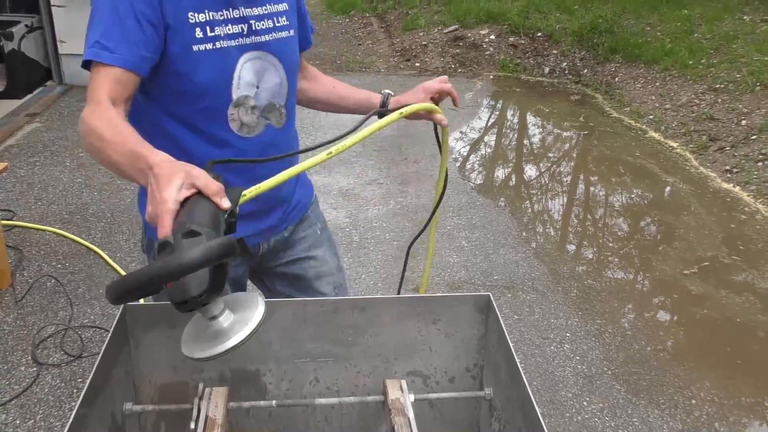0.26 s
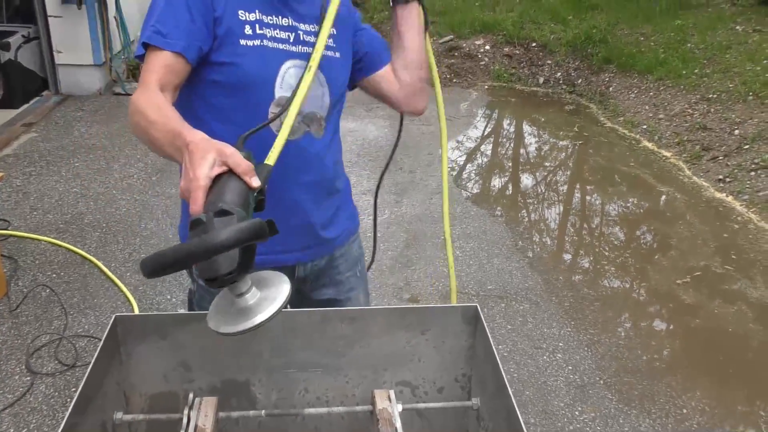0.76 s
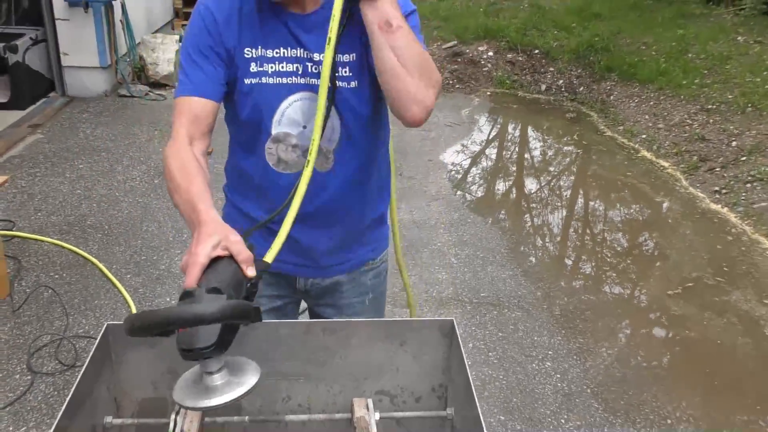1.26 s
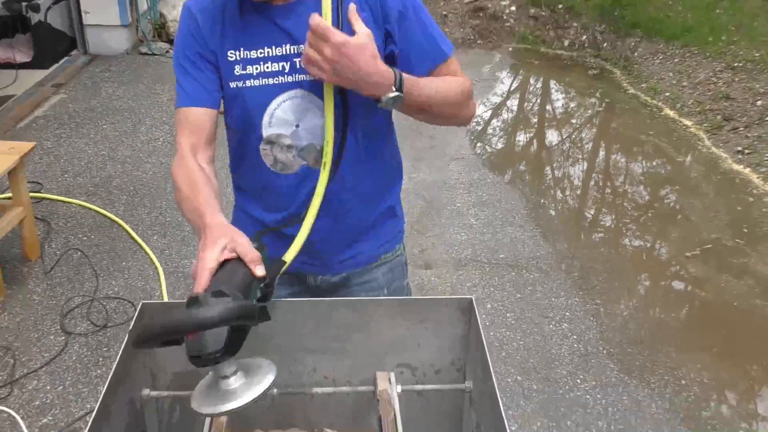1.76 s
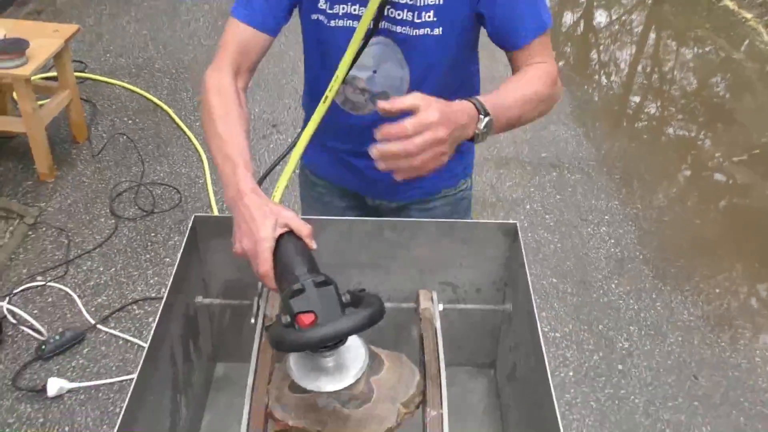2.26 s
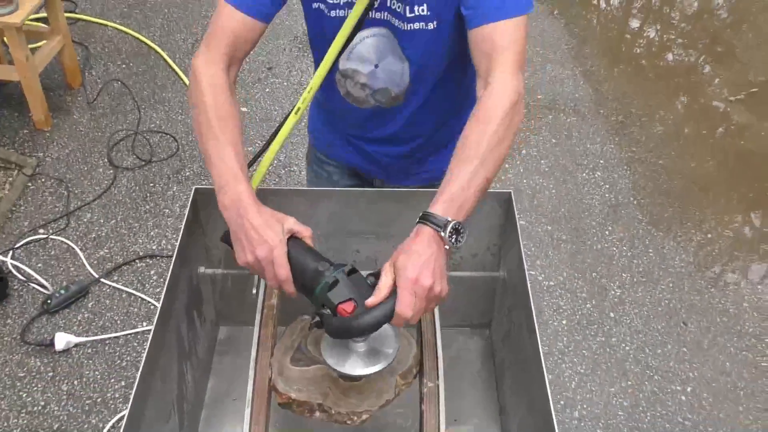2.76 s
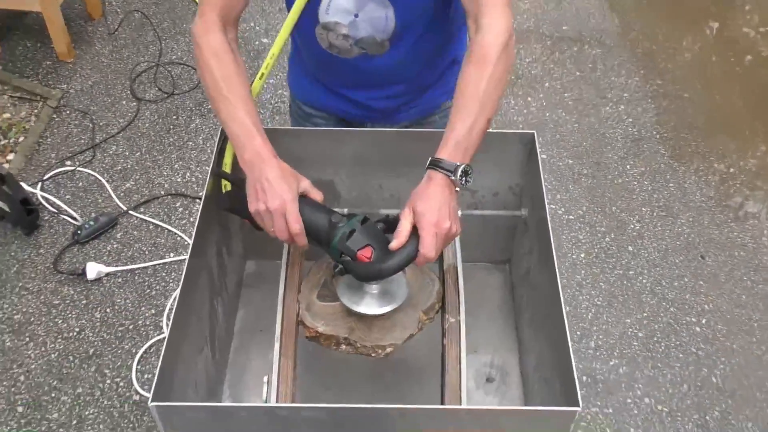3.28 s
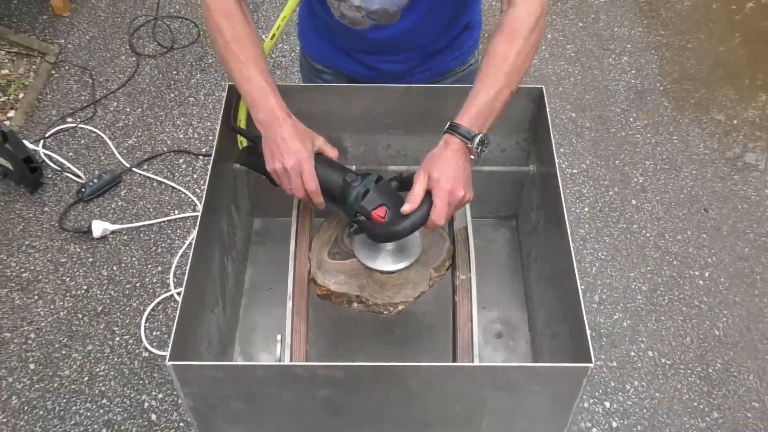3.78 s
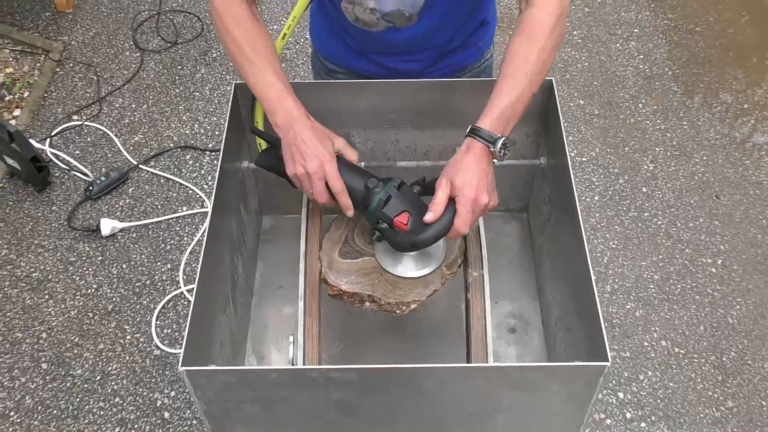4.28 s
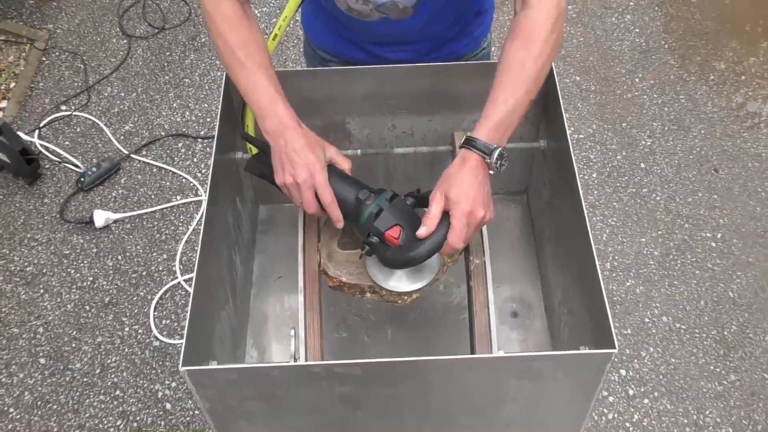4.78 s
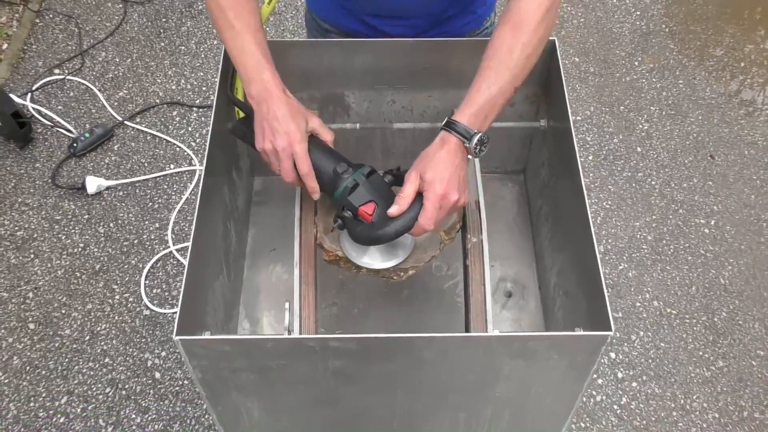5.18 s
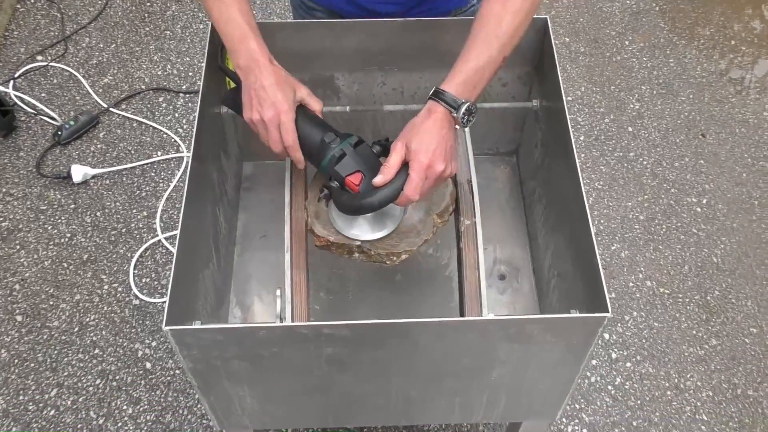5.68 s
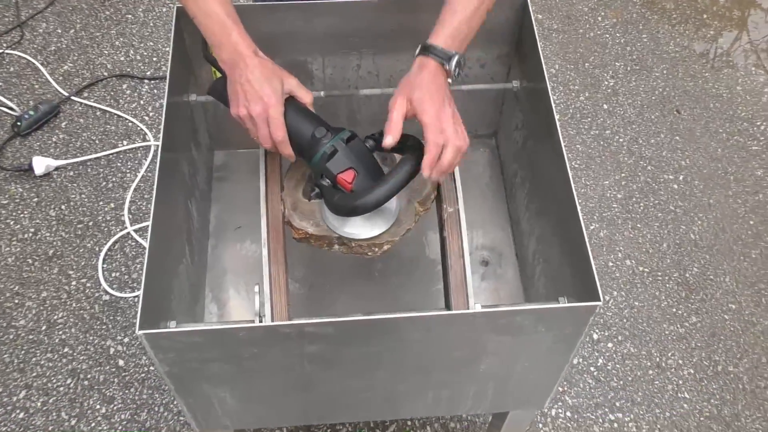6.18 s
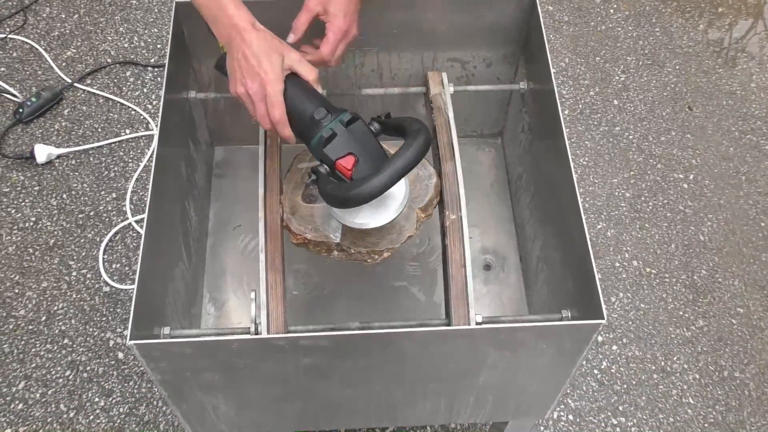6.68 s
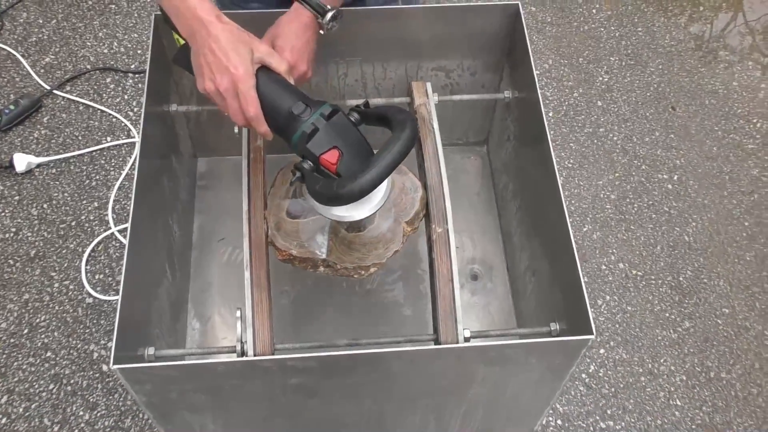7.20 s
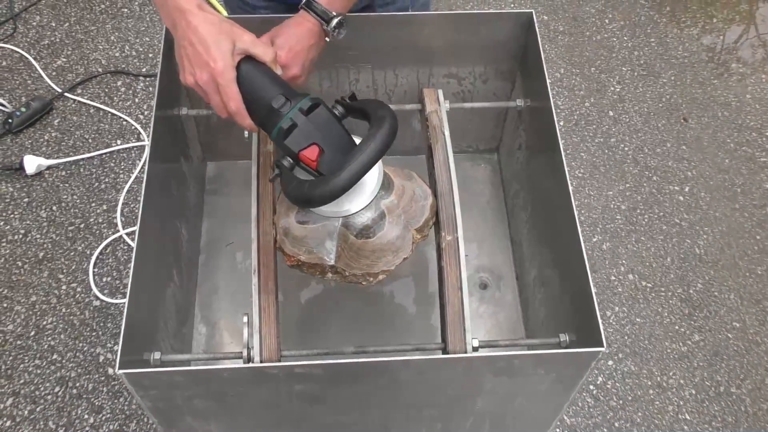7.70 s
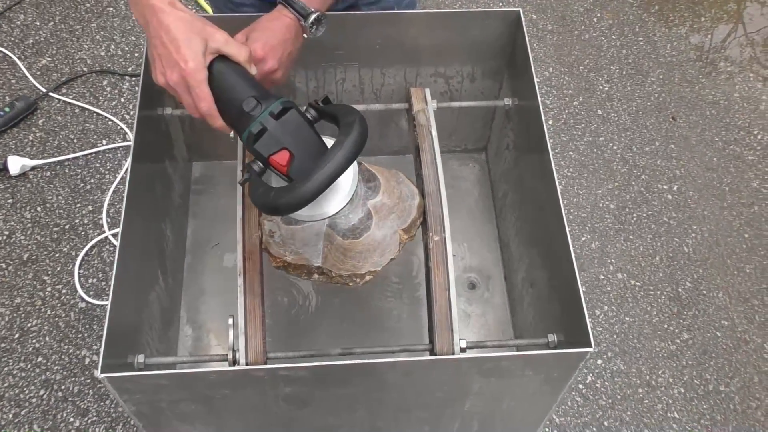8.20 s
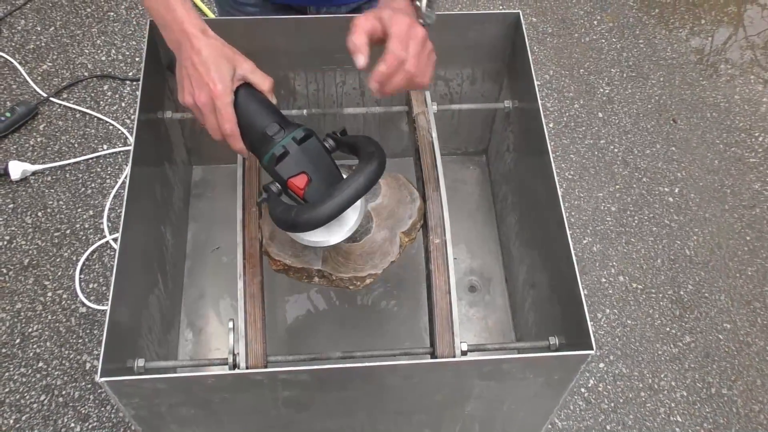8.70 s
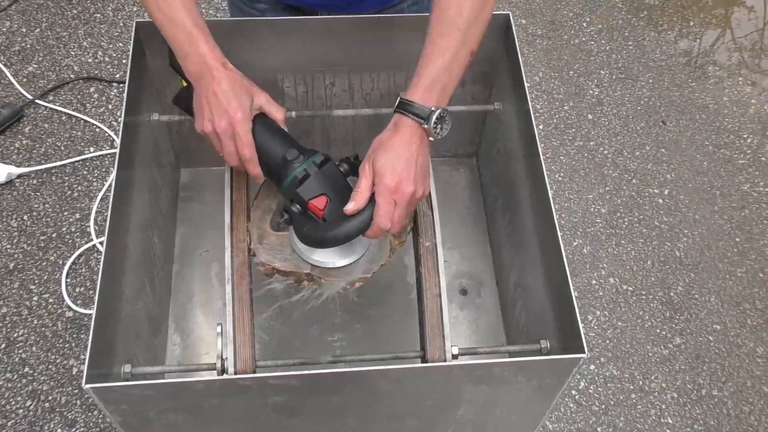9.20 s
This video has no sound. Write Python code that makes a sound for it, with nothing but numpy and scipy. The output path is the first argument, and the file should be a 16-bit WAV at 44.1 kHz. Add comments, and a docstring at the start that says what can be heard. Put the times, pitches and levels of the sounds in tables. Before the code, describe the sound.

Outdoors, about a metre away, an electric wet grinder runs without pause: singing gear, buzzing rattle, thin whistle and rushing fan air. After nearly three seconds the pad meets wet stone with a scrape, adding gritty hiss, water spray and a low steel tub drone. The hiss eases around six and a half seconds, then the pad judders and bites again at the end.

```python
"""Wet grinder on stone in a tub

Outdoors, microphone about a metre from a water-fed angle grinder polishing a stone slab in a steel tub.
The motor hums, buzzes and whistles at multiples of its speed, and the fan blows as coloured, ringing noise.
The bevel gear sings and rattles under a tooth load that swings with the spindle and the mains.
When the pad is pressed on the wet stone, noise hisses as grit, the gear rattles less and the tub drones."""
import sys
import numpy as np
from scipy import signal
from scipy.fft import rfft, irfft, next_fast_len
from scipy.io import wavfile

SR = 44100
rng = np.random.default_rng(int(sys.argv[2]) if len(sys.argv) > 2 else 0)


def transcribe(signal):
    """Save signal, clipped to [-1, 1], as a 16-bit WAV file at the path in sys.argv[1]."""
    frames = np.atleast_2d(signal).T
    limited = np.clip(frames, -1, 1)
    pcm = np.round(limited * 32767).astype(np.int16)
    wavfile.write(sys.argv[1], SR, pcm)


N = 416744
TIME = np.arange(N) / SR  # s
FREQ = np.maximum(np.fft.rfftfreq(N, 1 / SR), 1)  # Hz, kept above zero for the logarithms

# Levels in the tables stand before the trims in the functions.
# Event lengths run from the peak to a fall to 1/e; resonance widths are those of one of two equal stages.

# Armature speed, sagging as the tool is loaded. Each row: time in seconds, speed in turns per second.
ARMATURE_SPEED = [(0.0, 311.4), (0.76, 310.6), (1.34, 307.9), (1.44, 311.5), (1.74, 309.4), (2.28, 310.7),
                  (3.12, 306.7), (3.28, 309.5), (3.76, 306.9), (3.88, 310.5), (4.14, 304.0), (4.52, 308.8),
                  (5.02, 304.4), (5.34, 310.2), (6.06, 309.4), (6.58, 314.3), (6.78, 311.9), (7.18, 313.1),
                  (7.44, 309.1), (8.26, 310.2), (8.52, 306.8), (8.62, 309.4), (9.26, 306.9), (9.45, 301.8)]
# How strongly the gear sings; its rattle follows in part. Each row: time in seconds, level in dB.
GEAR_SINGING = [(0, -32), (.45, -32), (.9, -30), (1.3, -32.5), (1.53, -34), (1.7, -30.5), (2.5, -28.5),
                (2.75, -29.5), (2.9, -37), (3.12, -34.5), (3.3, -28.5), (3.8, -31.5), (4.4, -30),
                (5.5, -35.5), (6, -31.5), (7.08, -27.5), (7.5, -30), (8.5, -30.5), (8.75, -27.5),
                (8.95, -32), (9.45, -30.5)]
# Commutator whistle. Each row: time in seconds, level in dB.
BRUSH_WHISTLE = [(0, -40.5), (.5, -41.5), (.75, -34), (1.0, -44), (2.9, -40), (3.25, -36), (3.8, -41.5),
                 (5.1, -36.5), (7.3, -36), (7.55, -33.5), (8.6, -34), (9.45, -45)]
# Armature hum, louder inside the tub. Each row: time in seconds, level in dB.
ARMATURE_HUM = [(0, -56), (.9, -55), (1.2, -47.5), (2.05, -51.5), (3.1, -43.5), (4.5, -45.5), (6.4, -42),
                (7.5, -46), (8.9, -44), (9.45, -55)]
# Pad on the wet stone. Each row: time in seconds, hiss level in dB.
PAD_CONTACT = [(0, -85), (2.7, -74), (2.92, -37.5), (3.1, -33.5), (3.45, -40.5), (3.72, -34.5), (3.85, -37),
               (3.91, -31.5), (4.4, -32.5), (4.75, -34), (5.15, -30), (5.6, -32), (6.43, -32), (6.47, -42),
               (7.3, -44.5), (8.25, -45.5), (8.7, -60), (9.28, -39), (9.45, -32.5)]
# Water flung off the pad. Each row: time in seconds, level in dB.
WATER_SPRAY = [(0, -54), (3.75, -79), (4.0, -42), (5.1, -38.5), (5.7, -36), (6.5, -41.5), (7.25, -51),
               (7.75, -42), (8.3, -42), (9.15, -48), (9.45, -34)]
# The pad judders on the stone. Each row: peak in seconds, level in dB, length in seconds.
PAD_JUDDERS = [(9.046, -38, 0.017), (9.12, -35, 0.0091), (9.2, -44, 0.013), (9.258, -33, 0.014),
               (9.355, -38, 0.03), (9.44, -38, 0.017)]
# Tub resonances. Each row: centre in Hz, width in Hz, relative level in dB.
TUB_MODES = [(66.6, 21, -19), (129, 7.5, -19), (144.2, 8.7, -5), (163, 5.1, -45), (185, 8.9, -4),
             (214, 17, -20)]
# Spectra of the fan air, the grit and the drops. Each row: frequency in Hz, relative density in dB per Hz.
AIR_SPECTRUM = [(25, -25), (90, -27), (170, -13), (250, -12), (380, -7), (520, -1.5), (680, -5),
                (900, -0.5), (1500, 1), (2000, 0.5), (3200, -2), (4500, -6), (5250, -7.5), (6300, -9),
                (10500, -7), (14500, -17.5)]
GRIT_SPECTRUM = [(25, -45), (100, -14), (650, -9), (1600, -8.5), (2800, 1.5), (3600, 1), (4200, -0.5),
                 (4700, -1), (5400, 0), (7000, -5.5), (10000, -4), (14500, -11)]
DROP_SPECTRUM = [(1000, -20), (4500, -21), (5700, -8), (7000, 3), (9000, 6), (11300, 10), (12500, 6),
                 (14500, -4)]
# Spread between the microphones. Each row: frequency in Hz, side against mid in dB.
STEREO_WIDTH = [(25, -5), (70, 0), (150, -7), (500, -14.5), (4000, -10), (9500, -24), (11500, -10),
                (14000, -6.5)]
# Place of the grinder. Each row: time in seconds, left minus right in dB.
GRINDER_PLACE = [(0, 3), (.8, 1.4), (1.7, 2.5), (2.7, 0), (4.2, -0.2), (5.3, 0), (6.8, -0.3), (8.3, 0.8),
                 (9.45, 0)]
# Magnetic buzz. Each row: multiple of the armature speed, level in dB.
MAGNETIC_BUZZ = [(6, -57), (9, -47.5), (10, -49), (12, -47), (13, -51), (17, -53)]
# Stone and pad resonances. Each row: centre in Hz, width in Hz, relative level in dB.
STONE_MODES = [(3460, 290, -4), (3600, 290, -0.5), (3940, 260, 2), (4196, 90, 3)]
# Air in the tub, rung by the grit. Each row: centre in Hz, width in Hz, relative level in dB.
CAVITY_MODES = [(537, 20, -3.5), (789, 52, 5.5), (872, 97, 6.5), (1263, 38, -30), (1529, 39, 10),
                (2040, 72, 12)]
# Lower and upper gear case resonances. Each row: centre in Hz, width in Hz, relative level in dB.
LOW_CASE_MODES = [(2249, 107, -2.5), (2361, 168, 2.5)]
HIGH_CASE_MODES = [(2574, 195, 2.5), (2768, 170, -13.5)]
# Left-right balance of the hiss, by frequency. Each row: frequency in Hz, left minus right in dB.
HISS_BALANCE = [(2500, -0.5), (4000, 2.7), (9000, -2), (12500, 1.5)]
# The rim of the pad catches the stone. Each row: peak in seconds, level in dB, length in seconds.
RIM_SCRAPES = [(3.685, -29.5, 0.014), (3.717, -42, 0.005), (3.92, -34.5, 0.02), (9.315, -39, 0.015)]
# How far the tool is inside the tub, as it moves in and out.
# Each row: time in seconds, share inside from 0 to 1.
SHARE_INSIDE = [(0, 0.4), (2.0, 0), (3.0, 0.6), (6.0, 1), (7.0, 0.63), (9.45, 0.94)]
# Hollow ring of the tub around the fan. Each row: centre in Hz, width in Hz, relative level in dB.
HOLLOW_MODES = [(546, 86, -6), (744, 132, 3)]
# Resonance of the air vent. Each row: time in seconds, centre in Hz, level in dB.
VENT_RING = [(0, 1270, -35), (.4, 1210, -36.5), (1.7, 1260, -35.5), (1.95, 1150, -34.5),
             (2.55, 1220, -40.5), (3.1, 1195, -31), (3.9, 1260, -44.5), (5.1, 1235, -36.5),
             (5.8, 1255, -41), (6.9, 1210, -32), (7.55, 1180, -37.5), (8.55, 1165, -34.5),
             (8.85, 1220, -36.5), (9.45, 1275, -35.5)]
# The pad lies flat and sets the tub droning. Each row: start in seconds, end in seconds, level in dB.
TUB_DRONES = [(4.004, 5.15, -52.5), (5.543, 6.535, -52.5), (9.145, 9.6, -49.5)]
# The gear chatters harder for a moment. Each row: peak in seconds, level in dB, length in seconds.
GEAR_CHATTERS = [(1.26, -34, 0.097), (3.4, -35, 0.23), (3.62, -39, 0.036), (7.2, -39, 0.29),
                 (8.76, -37, 0.029), (9.23, -36, .06)]
# Tones of the shaken tub. Each row: multiple of the spindle rate, multiple of the mains ripple, level in dB.
TUB_TONES = [(2, 0, -3.5), (-1, 2, -8), (1, 1, -17), (3, 0, -15), (0, 2, -10.5), (4, 0, -22.5)]
# Brief swells of noise in one band: stone rasp, tub drone, air rush.
# Each row: peak in seconds, level in dB, length in seconds, centre in Hz, width in Hz.
NOISE_SWELLS = [(0.35, -44, 0.45, 4500, 1700), (1.82, -39.5, 0.31, 1508, 90), (3.118, -40, 0.26, 1500, 230),
                (3.2, -43, 0.15, 781, 170), (4.1, -38, 0.2, 4230, 78), (5.2, -39.5, 0.32, 3920, 260),
                (5.453, -51, 0.16, 190, 15), (6.3, -39, .13, 5210, 1100), (6.6, -44.5, 0.18, 786, 90),
                (8.2, -47.5, 0.54, 630, 110), (8.25, -43.5, 0.5, 5600, 350), (9.25, -45, .25, 795, 130),
                (9.25, -53, .2, 205, 12)]
# Microphone colour. Each row: frequency in Hz, gain in dB.
MICROPHONE_COLOUR = [(6600, 1), (7550, -4), (8500, 3.5), (9200, 4.5), (9600, 4), (10200, 0.5)]

PINION_TEETH, CROWN_TEETH = 8, 39
CROWN_LOBES = 4  # per spindle turn
WHISTLE_ORDER = 31  # whistle cycles per armature turn
MAINS_HZ = 50
CUTOFF_HZ = 14600
GEAR_USUAL_DB = -30
# the two rattles of the gear case: level at usual singing (dB), share of the singing's swing in dB
LOW_RATTLE_DB, LOW_RATTLE_FOLLOWS = -33, 0.12
HIGH_RATTLE_DB, HIGH_RATTLE_FOLLOWS = -37.5, 0.11
# a faster mesh drives the lower resonance harder and the upper one less (dB per turn per s)
LOW_RISE_DB, HIGH_FALL_DB = 0.47, 0.24
CLAMP_DB = 10.5  # firm pressure holds the teeth together: loss of low rattle at firmness 1
RUSH_DB, RUSH_FOLLOWS = -41.5, 0.16  # cooling air before trim; share of the vent's swing in dB
FIRM_DB = -31.5  # pad contact level that counts as firm pressure
DRONE_EDGE_S = 0.082
TREMBLE_DB, IDLE_DB = -60, -70  # the tub trembles with the pressure and with the idling tool
NOTCH_HZ, NOTCH_WIDTH_HZ, NOTCH_DEPTH = 673, 73, 0.69  # depth: share of amplitude lost at firmness 1
FADING_HZ = 5  # rate at which a weak whistle fades


def from_db(db):
    """Decibels to gain."""
    return 10 ** (np.asarray(db) / 20)


def rms_one(x):
    """Scale to unit power."""
    return x / np.sqrt(np.mean(x ** 2) + 1e-20)


def in_time(rows):
    """Each column of a curve at every sample."""
    s, *columns = np.transpose(rows)
    return [np.interp(TIME, s, column) for column in columns]


def colour(points):
    """Gain of a spectrum at every frequency, drawn straight over log frequency."""
    hz, db = np.transpose(points)
    return from_db(np.interp(np.log(FREQ), np.log(hz), db))


def drift(rate_hz):
    """Smooth chance with spread 1: low-passed noise."""
    size = next_fast_len(N, True)
    hz = np.fft.rfftfreq(size, 1 / SR)
    smooth = rfft(rng.standard_normal(size)) / (1 + (hz / rate_hz) ** 2) ** 2
    return rms_one(irfft(smooth, size)[:N])


def stereo_noise(spectrum):
    """Coloured noise from a shared mid and a side that sets the spread between the channels."""
    mid, side = rfft(rng.standard_normal((2, N))) * colour(spectrum)
    sign = np.array([[1], [-1]])
    channels = mid + sign * side * colour(STEREO_WIDTH)
    return rms_one(irfft(channels * colour(HISS_BALANCE) ** (sign / 2), N))


def resonate(x, modes):
    """Parallel resonances, each of two stages so that the skirts are steep."""
    response = 0
    for hz, width, db in modes:
        detuning = (FREQ ** 2 - hz ** 2) / (FREQ * width)
        response = response + from_db(db) / (1 + 1j * detuning) ** 2
    return rms_one(irfft(rfft(x) * response, N))


def wandering_ring(hz, width_hz):
    """Noise in one narrow resonance whose centre may move."""
    angle = 2 * np.pi * np.cumsum(hz) / SR
    return rms_one(drift(width_hz) * np.cos(angle) + drift(width_hz) * np.sin(angle))


def swells(rows):
    """A bell-shaped rise and fall in gain for each event."""
    return sum(from_db(db) * np.exp(-((TIME - s) / length) ** 2) for s, db, length in rows)


def firmness():
    """How firmly the pad is pressed on the stone, 0-1."""
    return np.tanh(from_db(in_time(PAD_CONTACT)[0] - FIRM_DB))


def tooth_load(spindle, mains, preload=0.31, runout=0.81, ripple=0.61, coupling=0.2, rough=0.19):
    """Spindle turns and mains half waves swing the tooth force and scale each other; at low force teeth part."""
    turn, pulse = np.cos(spindle), np.cos(mains)
    force = preload + runout * turn + ripple * pulse + coupling * turn * pulse + rough * drift(140)
    return rms_one(1 + np.tanh(force))


def rattle(load, modes, evenness=0.26, burstiness=0.85):
    """Case resonances with evened-out strength, so that the tooth load shapes each burst."""
    ringing = resonate(rng.standard_normal(N), modes)
    strength = np.abs(signal.hilbert(ringing, next_fast_len(N))[:N])
    even_ringing = ringing / np.sqrt(strength ** 2 + evenness ** 2)
    return rms_one(load ** burstiness * even_ringing)


def gear(rotor, spindle, mains, swing=0.62, chirp=0.7, lobes=0.1, rocking=0.24, jitter=0.24,
         tone_db=-0.48, waver_db=1.0, rattle_waver_db=0.5):
    """The meshing teeth sing, and their rattle rings the gear case in bursts."""
    mesh_db, = in_time(GEAR_SINGING)
    speed, = in_time(ARMATURE_SPEED)
    effort_db = mesh_db - GEAR_USUAL_DB
    overspeed = speed - speed.mean()
    load = tooth_load(spindle, mains)
    # the off-centre crown wheel shifts and rocks the teeth
    runout = -swing * np.sin(spindle) + rocking * np.cos(spindle) + lobes * np.sin(CROWN_LOBES * spindle)
    # flexing under load makes each burst fall in pitch
    lag = runout + chirp * load + jitter * drift(60)
    tone_level = from_db(mesh_db + tone_db + waver_db * drift(2.6))
    tone = tone_level * rms_one(load * np.sin(PINION_TEETH * rotor + lag))
    low_db = LOW_RATTLE_DB + LOW_RATTLE_FOLLOWS * effort_db + LOW_RISE_DB * overspeed - CLAMP_DB * firmness()
    high_db = HIGH_RATTLE_DB + HIGH_RATTLE_FOLLOWS * effort_db - HIGH_FALL_DB * overspeed
    low = from_db(low_db + rattle_waver_db * drift(5.5)) * rattle(load, LOW_CASE_MODES)
    high_level = from_db(high_db + rattle_waver_db * drift(6)) + swells(GEAR_CHATTERS)
    return tone + low + high_level * rattle(load, HIGH_CASE_MODES)


def motor(rotor, mains, hum_db=-4.5, whistle_db=-2.5, flutter=0.34, waver=0.1, flicker_db=1.5,
          fading_db=4.5, steady_db=-32):
    """Unbalance hums at armature speed; the brushes whistle, fluttering with the mains."""
    hum = from_db(in_time(ARMATURE_HUM)[0] + hum_db) * rms_one(np.sin(rotor))
    whistle = np.sin(WHISTLE_ORDER * rotor + flutter * np.sin(mains) + waver * drift(90))
    # pressing on the stone damps the whistle
    damping = 1 / (1 + from_db(in_time(PAD_CONTACT)[0] + 26.5))
    # a weak whistle fades in and out, a strong one holds
    strength_db, = in_time(BRUSH_WHISTLE)
    weakness = np.clip(1 - from_db(strength_db - steady_db), 0, 1)
    level = from_db(strength_db + whistle_db + fading_db * weakness * drift(FADING_HZ)) * damping
    return hum + level * rms_one(whistle * from_db(flicker_db * drift(19)))


def buzz(rotor, mains, depth=0.51, swing=0.31, waver_db=4.0):
    """Magnetic pull on the armature slots swells and eases with every mains half wave."""
    lag = -swing * np.sin(mains)
    slots = 0
    for order, db in MAGNETIC_BUZZ:
        level = from_db(db + waver_db * drift(7.3))
        slots = slots + level * np.sin(round(order) * rotor + lag + rng.uniform(0, 2 * np.pi))
    return np.sqrt(2) * slots * rms_one(1 + depth * np.cos(mains))


def tub(rotor, spindle, mains, rumble_db=-9, unsteady_db=2.5, wander=0.5):
    """The uneven pad and pulsing torque shake the tub; in brief judders the pad passes on the motor's hum."""
    tones = 0
    for turns, ripples, db in TUB_TONES:
        level = from_db(db + unsteady_db * drift(2.2))
        phase = round(turns) * spindle + round(ripples) * mains + wander * drift(7.3)
        tones = tones + np.sqrt(2) * level * np.sin(phase)
    rumble = from_db(rumble_db) * resonate(rng.standard_normal(N), TUB_MODES)
    drone = 0
    for start, end, db in TUB_DRONES:
        rise = np.tanh((TIME - start) / DRONE_EDGE_S)
        fall = np.tanh((TIME - end) / DRONE_EDGE_S)
        drone = drone + from_db(db) * (rise - fall) / 2
    outside = 1 - in_time(SHARE_INSIDE)[0]
    tremble = from_db(TREMBLE_DB) * firmness() ** 2 + from_db(IDLE_DB) * outside
    return np.hypot(drone, tremble) * (tones + rumble) + swells(PAD_JUDDERS) * np.sin(rotor)


def steel_walls(x, wall_db=-19):
    """A few short reflections from the sides, opposite in the two channels, widen the sound."""
    lags = (rng.uniform(0.001436, 0.0059, 4) * SR).astype(int)
    echoes = sum(np.pad(x, (lag, 0))[:N] for lag in lags) / 2
    return x + from_db(wall_db) * echoes * np.array([[1], [-1]])


def moving_echoes(x, echo=0.069, sway_s=0.00005):
    """Echoes off the near tub walls comb the rush; their paths change as the hands sway."""
    out = x
    for delay_s in (0.0017, 0.0029, 0.0041, 0.0066):
        heard = TIME - delay_s - sway_s * drift(0.53)
        out = out + echo * np.array([np.interp(heard, TIME, channel) for channel in x])
    return out / np.sqrt(1 + 4 * echo ** 2)


def fan(load, rush_db=9.0, vent_db=-3.0, vent_width_hz=85, skirt_width_hz=190, skirt_db=-1, throb=0.15,
        shading_db=6, hollow_db=-5, covered_db=3):
    """Air rushes through the housing and rings the tub; the vent resonance shifts as the tool is moved."""
    ring_hz, ring_db = in_time(VENT_RING)
    air_db = RUSH_DB + RUSH_FOLLOWS * (ring_db - ring_db.mean())
    # rush and hollow ring are softer while the pad lies flat on the stone
    flat = firmness() ** 2
    rush_level = from_db(air_db + rush_db - shading_db * flat)
    rush = rush_level * stereo_noise(AIR_SPECTRUM) * rms_one(1 + throb * load)
    # the vent has a narrow core on a broad skirt
    core = wandering_ring(ring_hz, vent_width_hz)
    skirt = from_db(skirt_db) * wandering_ring(ring_hz, skirt_width_hz)
    vent = from_db(ring_db + vent_db) * rms_one(core + skirt)
    hollow_level = from_db(air_db + hollow_db - covered_db * flat) * in_time(SHARE_INSIDE)[0]
    hollow = hollow_level * resonate(rng.standard_normal(N), HOLLOW_MODES)
    return moving_echoes(rush) + vent + hollow


def band_swells():
    """Brief swells of noise, each in one resonant band: stone rasp, tub drone, air rush."""
    out = 0
    for s, db, length, hz, width in NOISE_SWELLS:
        out = out + swells([(s, db, length)]) * wandering_ring(np.full(N, hz), width)
    return out


def grinding(spindle, wobble=0.033, grain_db=1.45, grit_db=0.64, spray_db=0.0, stone_db=-5, cavity_db=-12):
    """Grit scrapes a little harder once a turn and rings stone and tub; spray fizzes off the rim of the pad."""
    contact = from_db(in_time(PAD_CONTACT)[0] + grit_db) + swells(RIM_SCRAPES)
    pressure = (1 + wobble * np.cos(spindle)) * from_db(grain_db * drift(560))
    # the stone rings out only under firm pressure
    stone = from_db(stone_db) * firmness() * resonate(rng.standard_normal(N), STONE_MODES)
    cavity = from_db(cavity_db) * resonate(rng.standard_normal(N), CAVITY_MODES)
    grit = contact * pressure * (stereo_noise(GRIT_SPECTRUM) + stone + cavity)
    spray = from_db(in_time(WATER_SPRAY)[0] + spray_db) * stereo_noise(DROP_SPECTRUM)
    return grit + spray


def tub_notch(x):
    """With the tool flat on the stone, an echo in the tub cancels part of one band."""
    detuning = (FREQ ** 2 - NOTCH_HZ ** 2) / (FREQ * NOTCH_WIDTH_HZ)
    band = irfft(rfft(x) / (1 + 1j * detuning), N)
    return x - NOTCH_DEPTH * firmness() * band


def scene(hunt_hz=0.392, buzz_outside_db=-4):
    """One armature drives every part of the machine."""
    turns_per_s = in_time(ARMATURE_SPEED)[0] + hunt_hz * drift(17.8)
    rotor = 2 * np.pi * np.cumsum(turns_per_s) / SR
    spindle = rotor * PINION_TEETH / CROWN_TEETH
    mains = 2 * np.pi * 2 * MAINS_HZ * TIME  # two half waves per mains cycle
    outside = 1 - in_time(SHARE_INSIDE)[0]
    buzzing = from_db(buzz_outside_db * outside) * buzz(rotor, mains)
    tonal = gear(rotor, spindle, mains) + motor(rotor, mains) + buzzing + tub(rotor, spindle, mains)
    noisy = fan(tooth_load(spindle, mains)) + grinding(spindle) + band_swells()
    sound = steel_walls(tonal) + tub_notch(noisy)
    return sound * from_db(in_time(GRINDER_PLACE)[0] * np.array([[0.5], [-0.5]]))


def record(dry):
    """The microphone port notches the treble; the top is cut steeply."""
    low_pass = 1 / np.sqrt(1 + (FREQ / CUTOFF_HZ) ** 900)
    return irfft(rfft(dry) * colour(MICROPHONE_COLOUR) * low_pass, N)


dry = scene()
out = record(dry)
transcribe(out)
```